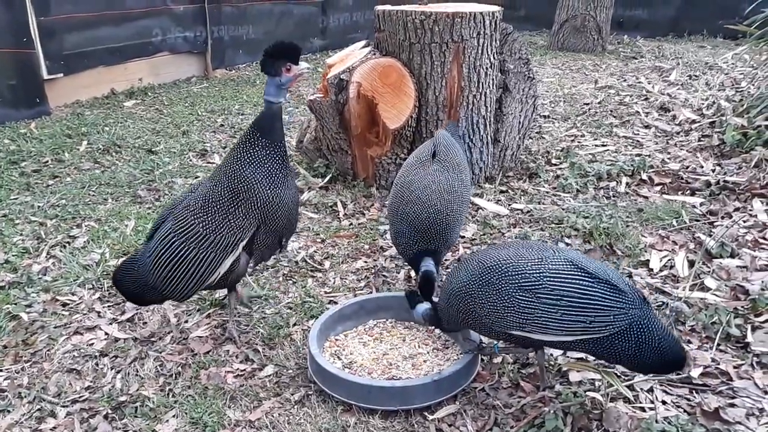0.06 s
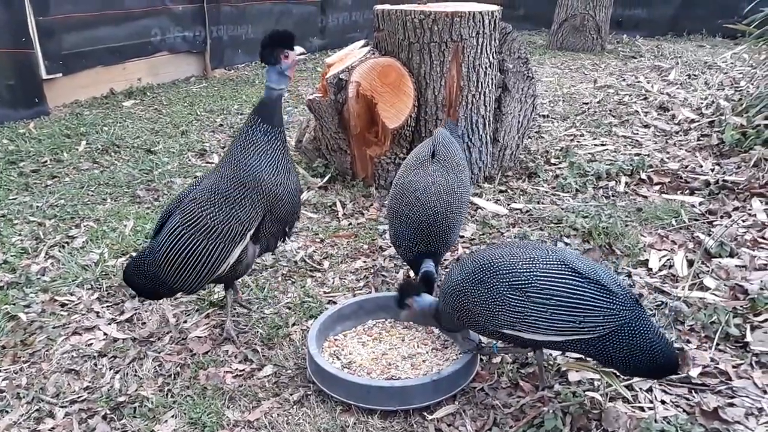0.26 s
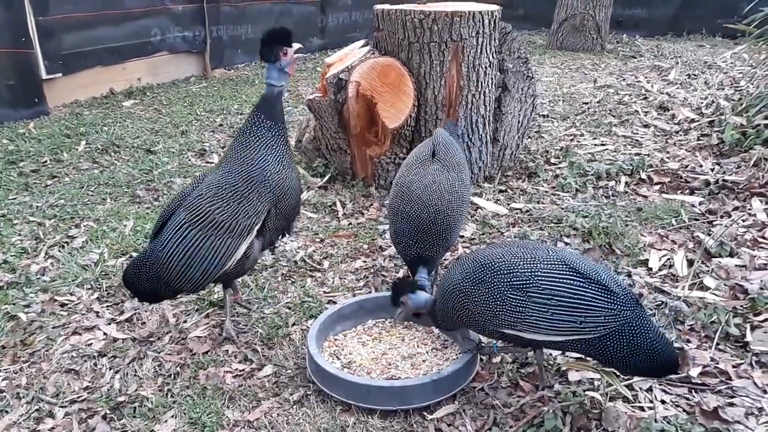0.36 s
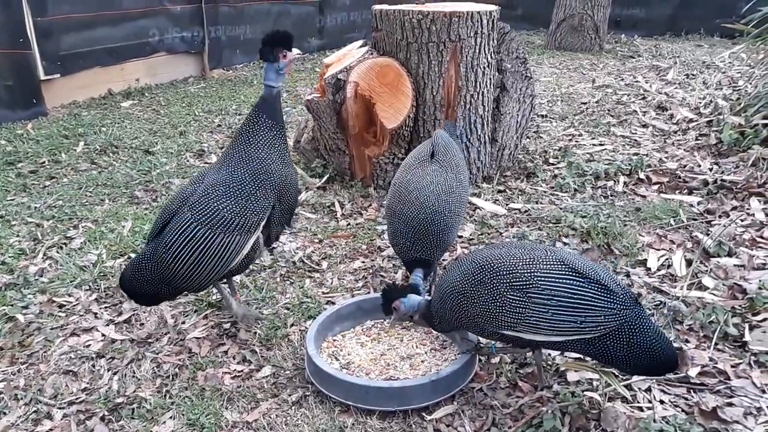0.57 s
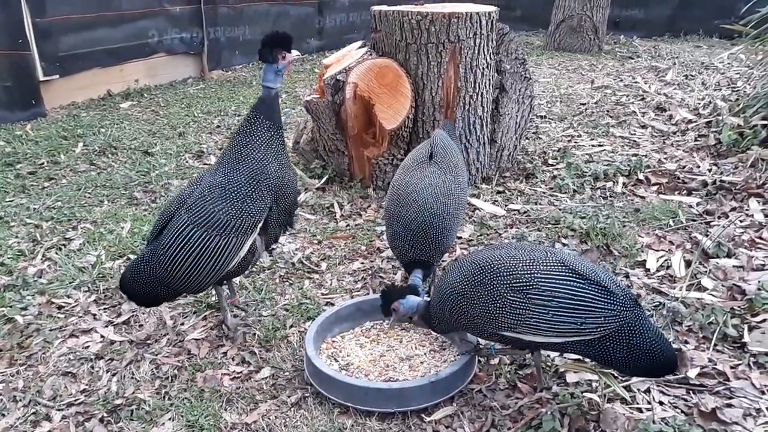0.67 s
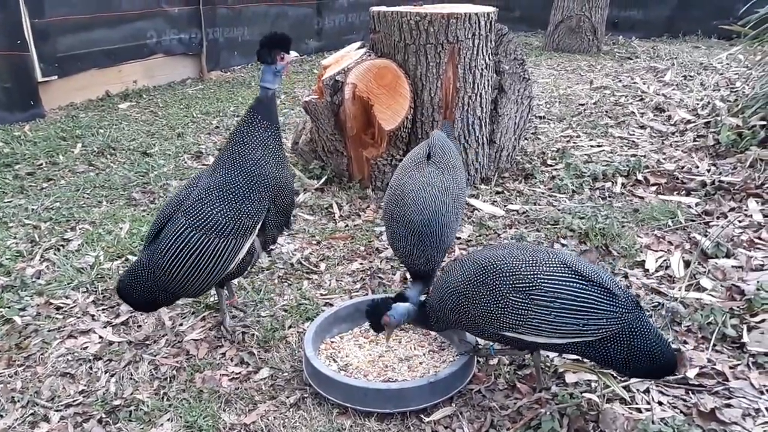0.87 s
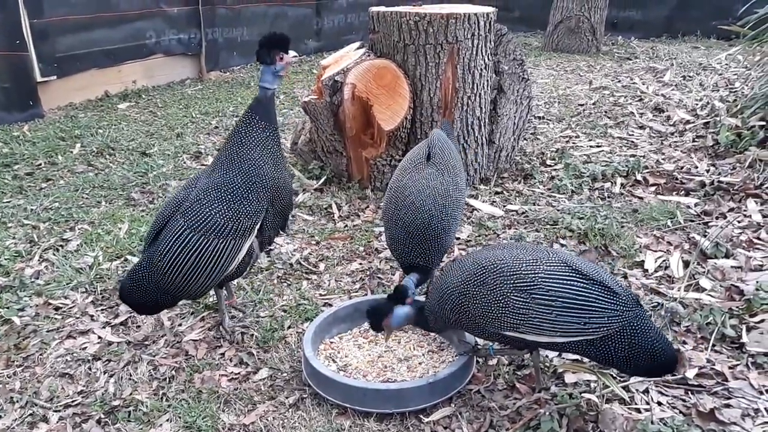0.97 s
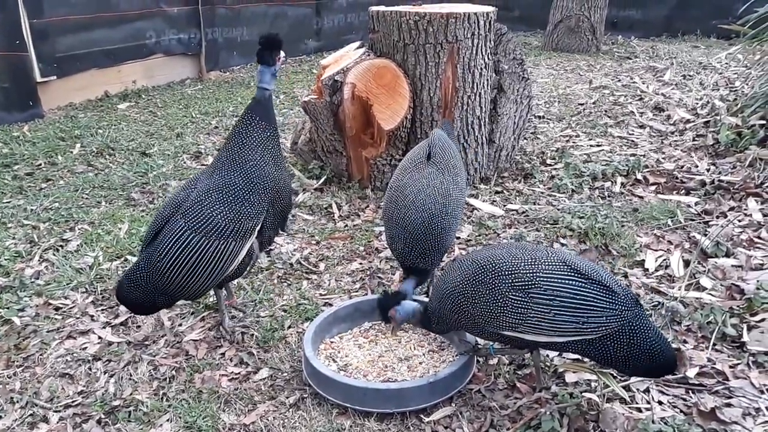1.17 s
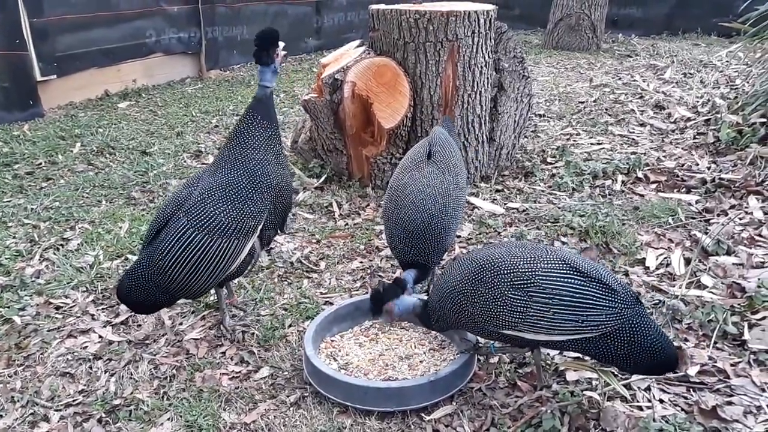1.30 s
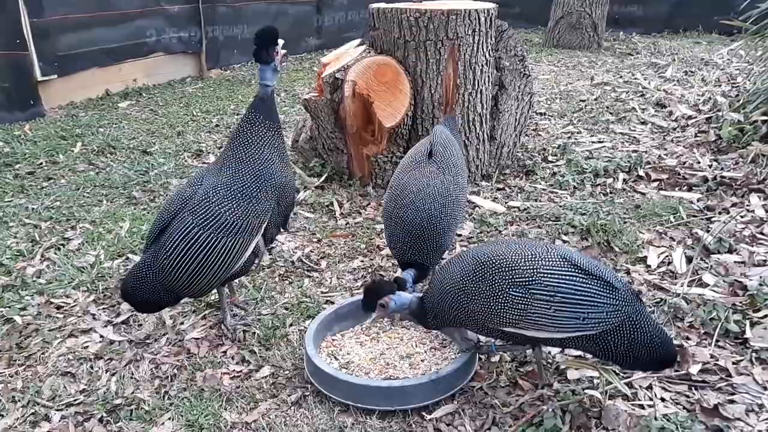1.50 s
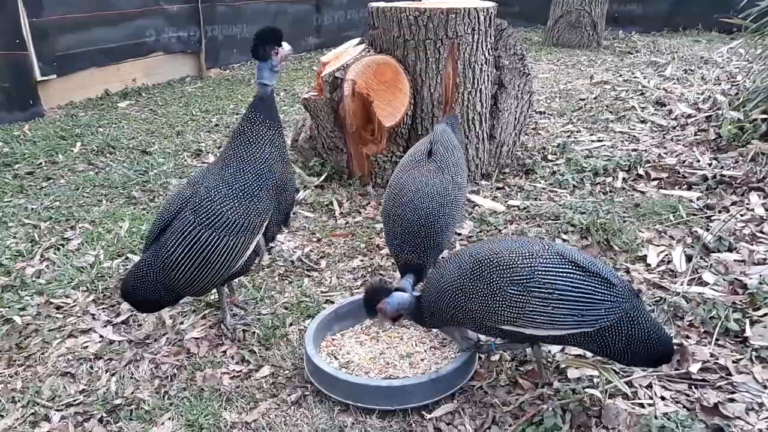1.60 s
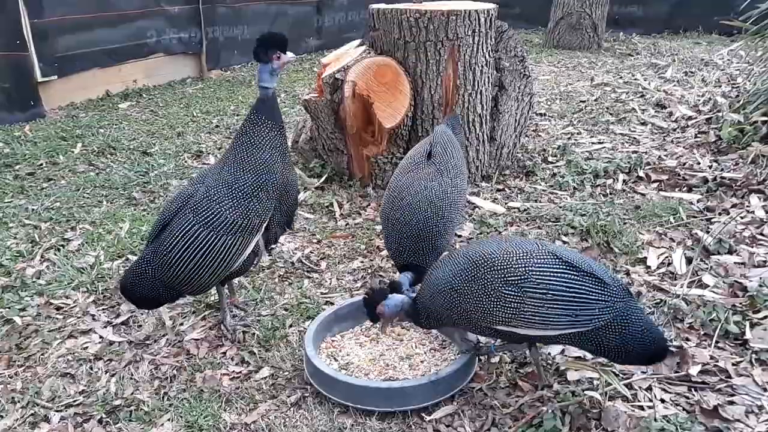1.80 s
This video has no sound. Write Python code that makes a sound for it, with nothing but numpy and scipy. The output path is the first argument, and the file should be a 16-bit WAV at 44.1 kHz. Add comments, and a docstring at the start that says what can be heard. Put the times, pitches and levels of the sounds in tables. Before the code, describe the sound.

Guinea fowl give two quick runs of harsh, piercing notes outdoors.

```python
"""A feed bowl on a lawn: guinea fowl give two quick runs of harsh notes and a single one between them.
Each note scoops down onto a piercing whistle; when the bird presses, the other side of its syrinx
joins with a low voice, and the two mix into a rasp. Small upward slurs link the notes, bills and feet
tick in the litter, and the yard answers faintly over a quiet outdoor hum."""
import sys
import numpy as np
from scipy import signal
from scipy.fft import rfft, irfft, next_fast_len
from scipy.io import wavfile

SR = 44100
rng = np.random.default_rng(int(sys.argv[2]) if len(sys.argv) > 2 else 0)


def store_wav(level_fs):
    """Save 16-bit WAV to argv[1]."""
    pcm = np.round(np.clip(np.atleast_2d(level_fs), -1, 1) * 32767)
    wavfile.write(sys.argv[1], SR, pcm.T.astype(np.int16))


N = 81585
RUN_IN = SR // 4
TIME = np.arange(-RUN_IN, N) / SR
FFT_SIZE = next_fast_len(len(TIME) + SR)
BINS_HZ = np.maximum(np.fft.rfftfreq(FFT_SIZE, 1 / SR), 1)


def amp(db):
    """Decibels to gain."""
    return 10 ** (np.asarray(db) / 20)


def unit(x):
    """Scale to rms 1."""
    return x / np.sqrt(np.mean(x ** 2) + 1e-20)


def per_bin(points):
    """Interpolate a table over log frequency."""
    hz, value = np.transpose(points)
    return np.interp(np.log(BINS_HZ), np.log(hz), value)


def filtered(x, response):
    """Apply a frequency response."""
    return irfft(rfft(x, FFT_SIZE) * response, FFT_SIZE)[..., :len(TIME)]


def noise(spectrum):
    """Shaped noise, rms 1."""
    return unit(filtered(rng.standard_normal(len(TIME)), amp(per_bin(spectrum))))


def wobble(n, corner_hz=220):
    """Low-passed noise, rms 1."""
    pole = np.exp(-2 * np.pi * corner_hz / SR)
    return unit(signal.lfilter([1], [1, -2 * pole, pole * pole], rng.standard_normal(n)))


def ramp(x):
    """Smooth step, 0 to 1."""
    return np.sin(np.pi / 2 * np.clip(x, 0, 1)) ** 2


def window(start_s, length_s):
    """Mask round an event, and time since its start."""
    where = np.abs(TIME - start_s - length_s / 2) < length_s / 2 + .05
    return where, TIME[where] - start_s


# Calls: t/s, hold/s, scoop/s, f/Hz, level/dB, sag over hold/dB, scoop/dB, low voice/dB, flutter/dB,
# rasp/dB, roughness/0-1
NOTES = [ (-.135, 0.063, 0.0091, 1750, -14.5, -3.5, -22, -14.5, -43, -24.5, 0.1),
         (0.198, 0.02887, 0.01182, 1708, -17, 11, -19.5, -3.5, -17, -25.5, 0.81),
         (0.294, 0.02393, 0.01532, 1683, -14, 5.5, -19.5, -41, -32.5, -41.5, .08),
         (0.361, 0.03363, 0.0067, 1717, -8.5, 4.5, -20, -17.5, -37.5, -42, 0.04),
         (0.437, 0.0394, 0.01765, 1725, -7.5, 8.5, -18, -4.5, -30, -28.5, 0.1),
         (0.953, 0.02172, 0.0253, 1686, -14, 11, -23.5, -9, -24, -34.5, 0.77),
         (1.224, 0.0348, 0.01427, 1697, -17.5, 17.5, -30.5, -34, -23.5, -46.5, 0.48),
         (1.316, 0.02247, .016, 1732, -9, 8.5, -22, -35.5, -36.5, -43.5, 0.14),
         (1.381, .028, 0.01458, 1731, -7, 7, -18.5, -21.5, -45, -60, .05),
         (1.448, 0.03275, 0.01515, 1743, -7.5, 4, -17, -11, -40, -41.5, 0.13),
         (1.510, 0.0592, 0.00987, 1749, -9.5, 2.5, -18, -0.5, -31, -28, 0.24)]
# Whistle harmonics 1-9: level/dB
WHISTLE_DB = [0.5, -18, -28, -35, -66, -51, -43, -75.5, -60]
# Spectra of throat rasp, scoop and slur hiss, low-voice rattle: f/Hz, level/dB
RASP_SPECTRUM = [(200, -18.5), (450, -21.5), (650, 1), (850, -13.5), (1300, 4), (1650, 5), (2100, -4),
                 (2800, 2.5), (3100, -10), (3450, -5.5), (4400, 1), (5000, -17.5), (5800, 2.5), (6400, 0.5),
                 (7100, -8.5), (8500, -14.5), (9900, -27.5), (11200, -13), (12500, -25), (15000, -20),
                 (16000, -29.5)]
HISS_SPECTRUM = [(600, -25.5), (1300, -19.5), (1720, 16), (2300, -13), (3100, -14), (4100, -3),
                 (5000, -14.5), (5500, -3), (5780, 7), (6050, 1.5), (6900, -15.5), (9000, -27.5),
                 (11200, -21), (16000, -34.5)]
RATTLE_SPECTRUM = [(200, -13.5), (350, -2.5), (600, -2.5), (1100, 0), (2000, -22.5), (8000, -53)]


def notes(attack_s=0.002786, release_db_per_s=1095, droop_hz_per_s=4825):
    """Both sides of the syrinx: whistle and low voice, with a rattle as the low voice dies."""
    out, throat = np.zeros((2, len(TIME)))
    hiss, rattle = noise(HISS_SPECTRUM), noise(RATTLE_SPECTRUM)
    for start, hold, scoop_s, hz, db, sag_db, scoop_db, low_db, flutter_db, rasp_db, rough in NOTES:
        where, t = window(start, hold)
        along, after_s = np.clip(t / hold, 0, 1), np.maximum(t - hold, 0)
        gate = ramp(t / attack_s + 1 / 4) * amp(-release_db_per_s * after_s)
        sag = amp(-sag_db * along ** 2)
        slack = (along / 0.6785 - 1) ** 2  # 0 at the low voice's peak
        pressed = min(amp(low_db), 1)
        # Pitch starts high; unpressed notes also end high.
        bow_hz = 28.04 * ((2 * along - 1) ** 4 * (1 - 2 * pressed * along) - 1 / 5)
        droop_hz = droop_hz_per_s * after_s
        high = membrane(hz + bow_hz - pressed * (16.03 * (along - .5) + droop_hz), rough)
        low = membrane(.361 * hz - 20.9 * along ** 2 - droop_hz, rough)
        whistle = amp(db) * sag * tone(high, WHISTLE_DB, rough, overtone_gain=(gate * sag) ** 0.42)
        sidebands = amp(flutter_db + 5.5 * (along - .5)) * flutter(high, pressed, rough)
        undertone = amp(low_db - 14 * slack) * low_voice(high, low)
        throat[where] += gate * amp(rasp_db - slack) * rasp(high, low)
        out[where] += gate * (whistle + np.sqrt(2) * (sidebands + undertone))
        out[where] += amp(low_db - 40.5 - 599 * np.abs(t - hold)) * rattle[where]
        out[where] += amp(scoop_db) * scoop(t, scoop_s, hiss[where])
    return out + filtered(throat, unit(amp(per_bin(RASP_SPECTRUM))))


def membrane(hz, rough, jitter=0.02103):
    """Phase/rad of a membrane whose pitch trembles with roughness."""
    offset = rng.random()
    trembling_hz = hz * (1 + jitter * rough * wobble(len(hz)))
    return 2 * np.pi * (offset + np.cumsum(trembling_hz) / SR)


def tone(phase, harmonics_db, rough, overtone_gain=1, shimmer_db=3):
    """Membrane harmonics, shaken in level by roughness."""
    stack = sum(amp(db) * np.sin(k * phase) * (overtone_gain if k > 1 else 1)
                for k, db in enumerate(harmonics_db, 1))
    return np.sqrt(2) * stack * unit(amp(shimmer_db * rough * wobble(len(phase))))


def flutter(high, pressed, rough, rate_hz=254.71):
    """Sidebands round the whistle, plus a faint hum when pressed."""
    beat = membrane(np.full(len(high), rate_hz), rough)
    return np.sin(high - beat) + amp(-9) * np.sin(high + beat) + amp(-23) * pressed * np.sin(beat)


# Mixing tones: whistle multiple, low-voice multiple
MIX_ORDERS = [(0, 1), (1, -1), (0, 2), (1, 1), (2, -1), (2, -2), (3, -3), (3, -2), (2, 1), (3, -1), (2, 2),
              (4, -2), (3, 1), (4, -1), (5, -3), (7, -2)]
# Per mixing tone: level/dB
MIX_DB = [-29.5, -33, -33.5, -27.5, -29.5, -54, -49, -51, -38.5, -41.5, -46, -25.5, -38, -40.5, -50.5, -46]


def low_voice(high, low):
    """Second side of the syrinx, with its sum and difference tones against the whistle."""
    return sum(amp(db) * np.sin(k * high + m * low) for (k, m), db in zip(MIX_ORDERS, MIX_DB))


def rasp(high, low, puff_depth=0.63):
    """Dense buzz of both voices, plus breath puffed at the low voice's rate."""
    buzz = unit(sum(np.sin(k * high + m * low + 2 * np.pi * rng.random())
                    for k in range(1, 10) for m in range(-2, 3)))
    puffs = rng.standard_normal(len(low)) * (1 + puff_depth * np.sin(low))
    return amp(-1.5) * buzz + amp(-6.5) * puffs


# Scoop harmonics 1-3: level/dB
SCOOP_DB = [1, -21, -18]


def scoop(t, length_s, hiss, from_hz=2150, to_hz=1827.4, rough=0.645, rise_s=0.00837, fall_s=0.0038):
    """Rough, hissing downward slide into a note."""
    hz = to_hz + (from_hz - to_hz) * np.clip(-t / length_s, 0, 1) ** 2
    envelope = ramp((t + length_s) / rise_s) * ramp(1 - t / fall_s)
    return envelope * (tone(membrane(hz, rough), SCOOP_DB, rough) + amp(-4.5) * hiss)


# Slurs: t/s, length/s, start f/Hz, end f/Hz, level/dB
SLURS = [(.168, 0.0192, 2649, 2776, -42), (0.246, 0.024, 1848, 2048, -29.5),
         (0.318, 0.022, 1884, 2218, -27.5), (0.399, 0.013, 1964, 2195, -24.5),
         (0.898, 0.03, 2041, 2629, -46), (1.178, 0.0268, 2120, 2454, -46.5),
         (1.263, 0.036, 2017, 2600, -41), (1.34, .018, 1885, 2245, -24), (1.407, 0.016, 1915, 2209, -19.5),
         (1.48, 0.01582, 1956, 2202, -17)]


def slurs(rough=0.496, harmonics_db=(-2, -20, -21.5, -46), hiss_db=-19.5):
    """Rising peeps as the syrinx tightens between notes."""
    out, hiss = np.zeros(len(TIME)), noise(HISS_SPECTRUM)
    for start, length, from_hz, to_hz, db in SLURS:
        where, t = window(start, length)
        along = np.clip(t / length, 0, 1)
        phase = membrane(from_hz + (to_hz - from_hz) * along, rough)
        peep = tone(phase, harmonics_db, rough) + amp(hiss_db) * hiss[where]
        out[where] += amp(db) * np.sin(np.pi * along) * peep
    return out


# Bill response: f/Hz, gain/dB
BILL_RESPONSE = [(60, -36), (250, -10.5), (500, 0), (7000, 0), (7700, -16), (8400, -5), (9700, -11),
                 (10800, -1), (16000, 2)]


def bill(voice):
    """The open bill radiates the voice, weak in the bass."""
    return filtered(voice, amp(per_bin(BILL_RESPONSE)))


# Pecks and steps: t/s, level/dB
PECKS = [(0.862, -62.5), (1.003, -49), (1.014, -41.5), (1.106, -62.5), (1.686, -44.5), (1.697, -51),
         (1.78, -54.5)]
# Litter crunch: f/Hz, level/dB
LITTER_SPECTRUM = [(200, -15), (700, 2.5), (1500, 5), (3000, -2.5), (6500, 2), (8000, -19.5), (12000, -8),
                   (16000, -23)]


def pecks(decay_db_per_s=787):
    """Bills and feet crunch dry seed and leaves."""
    envelope = sum((TIME > start) * amp(db - decay_db_per_s * np.abs(TIME - start))
                   for start, db in PECKS)
    return envelope * noise(LITTER_SPECTRUM)


# Left phase lead: f/Hz, phase/rad
LEFT_LEAD = [(100, -3), (680, 0.25), (1050, 2.2941), (1280, 1.06), (1480, 4.5), (1670, 1), (1760, 2),
             (1980, 2.5), (2120, 0.837), (2400, 0), (2750, 0.98), (3050, -2.5), (3450, 1.44), (3900, 1.66),
             (4150, -2.5), (4600, 1), (5400, -2.69), (5750, -0.89), (6050, -3), (6400, 3), (7000, -3.01),
             (9500, -1), (11000, 1.5), (16000, 2)]
# Left minus right: f/Hz, level/dB
BALANCE = [(600, -1), (1720, -2.34), (2400, -3.5), (2850, -4), (3450, 0.5), (5800, 1.5), (11000, 0)]


def direct_path(x):
    """Direct sound reaches the two channels with different phase and level."""
    left = amp(per_bin(BALANCE) / 2) * np.exp(.5j * per_bin(LEFT_LEAD))
    return filtered(x, np.array([left, 1 / left]))


# Reflection colour: f/Hz, gain/dB
YARD_RESPONSE = [(200, 9.5), (600, 5), (1100, 3), (1420, 1), (1720, 2), (2200, 2), (3400, 1), (4600, 13),
                 (5800, -1), (11000, 6.5), (16000, -2.5)]


def yard(x, first_echo_s=0.0063):
    """Scatter from ground, stump and fence: near echoes and a faint tail per channel."""
    t = TIME + RUN_IN / SR

    def tail(db, t60_s):
        scatter = rng.standard_normal(len(t)) * amp(-60 * t / t60_s) * (t > first_echo_s)
        return amp(db) * scatter / np.linalg.norm(scatter)

    echoes = [tail(-14.5, t60_s=0.1566) + tail(-24, t60_s=0.5725) for _ in range(2)]
    return filtered(x, rfft(echoes, FFT_SIZE) * amp(per_bin(YARD_RESPONSE)))


# Outdoor hum: f/Hz, level/dB
AIR_SPECTRUM = [(30, -39), (50, -22.5), (80, -13), (110, -10), (170, -13.5), (255, -3.5), (400, -15),
                (620, -14.5), (900, -16), (1700, -12.5), (2300, -21), (2900, -13), (3500, -24),
                (5000, -20.5), (6700, -23), (7600, -37.5), (16000, -32)]


def air(db=-60.5, wide_above_hz=900):
    """Faint outdoor background, centred in the bass, wide above."""
    side = filtered(noise(AIR_SPECTRUM), BINS_HZ / np.hypot(BINS_HZ, wide_above_hz))
    return amp(db) * (noise(AIR_SPECTRUM) + side * np.array([[1], [-1]]))


def scene():
    """Birds, reflections and background, in stereo."""
    birds = bill(notes() + slurs()) + pecks()
    return (direct_path(birds) + yard(birds) + air())[:, RUN_IN:]


def record(dry):
    """Steep low-pass at 15.9 kHz."""
    return signal.sosfilt(signal.ellip(10, .1, 80, 15900, fs=SR, output="sos"), dry)


dry = scene()
out = record(dry)
store_wav(out)
```